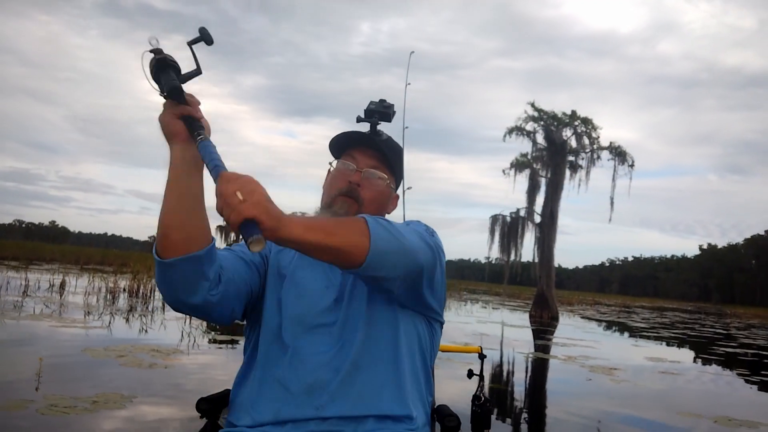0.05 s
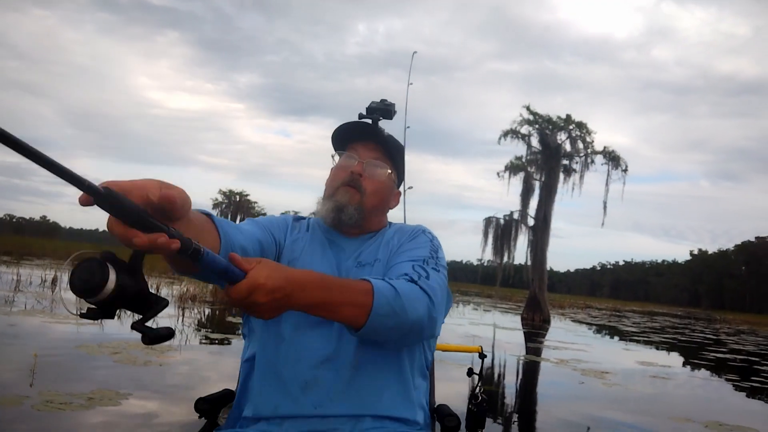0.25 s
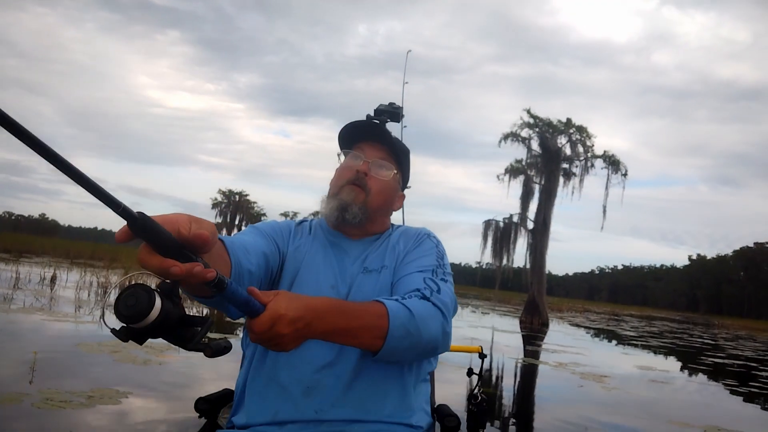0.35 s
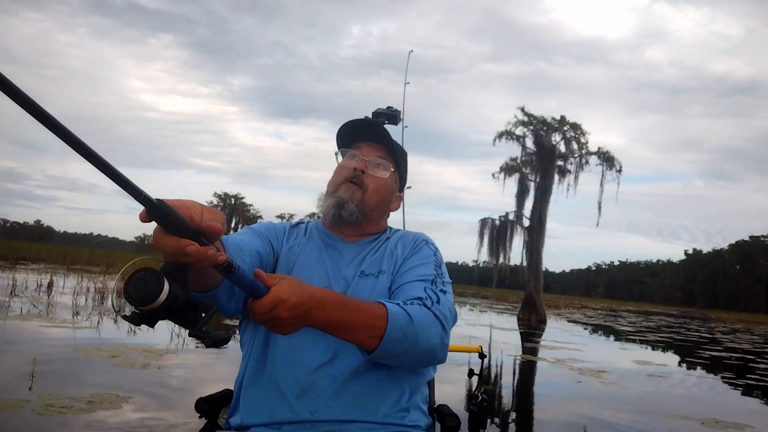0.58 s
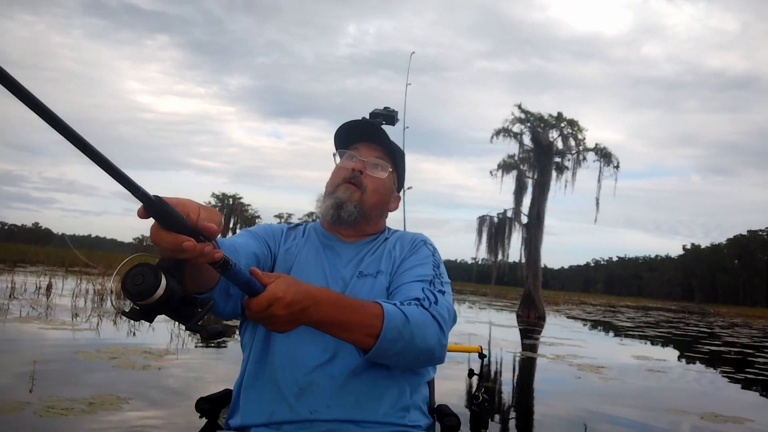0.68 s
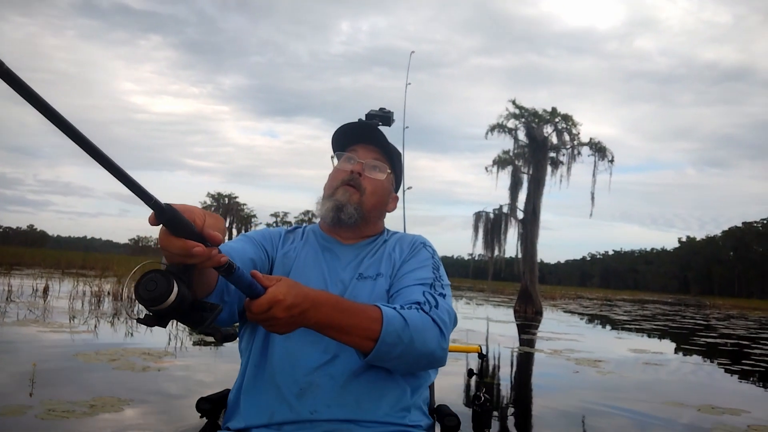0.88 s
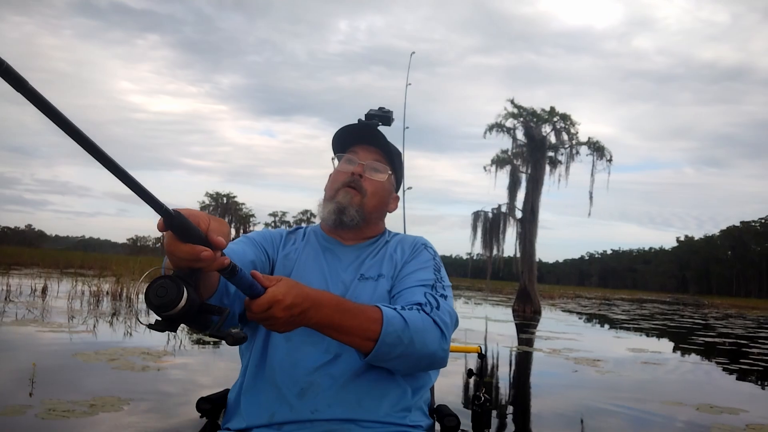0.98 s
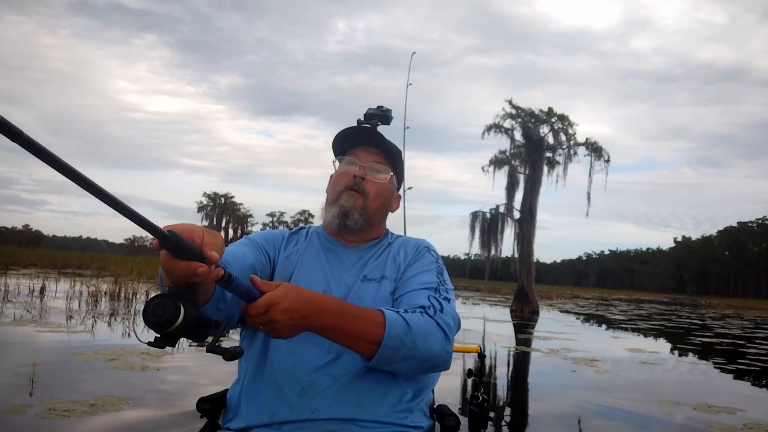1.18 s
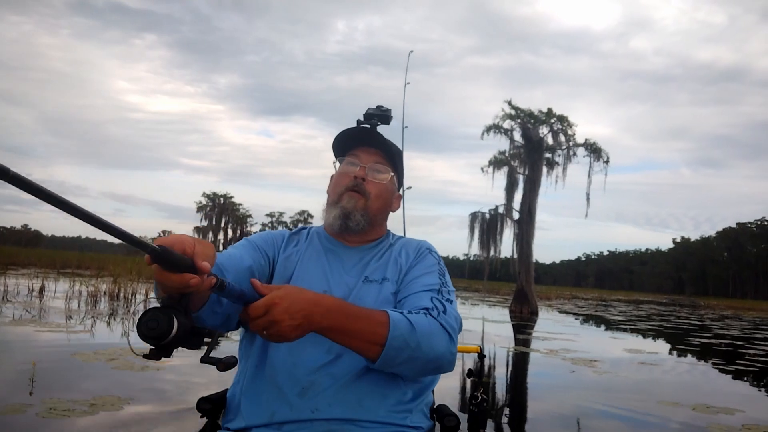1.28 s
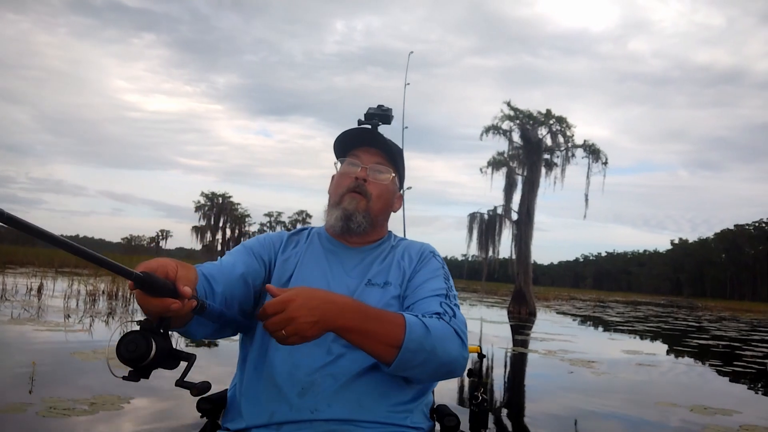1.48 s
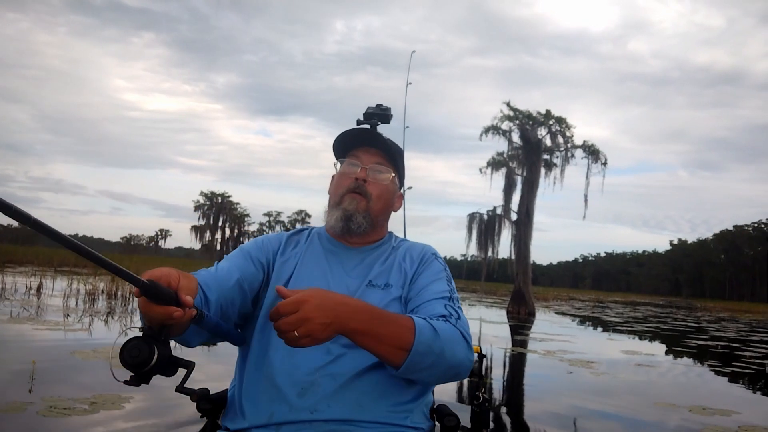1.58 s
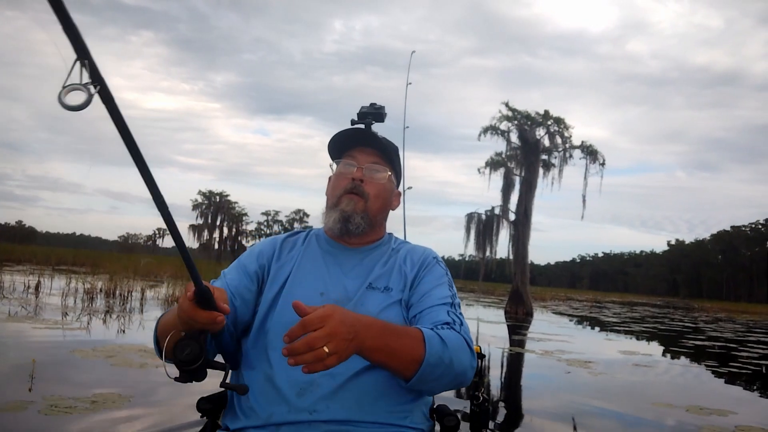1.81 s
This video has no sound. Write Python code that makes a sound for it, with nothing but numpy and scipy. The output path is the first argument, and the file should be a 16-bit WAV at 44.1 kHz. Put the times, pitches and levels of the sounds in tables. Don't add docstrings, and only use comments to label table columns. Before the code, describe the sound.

A fishing cast, heard close on a stereo camera microphone. Small rod and reel knocks at 0.02 s, then a brief loud swish with snap and clack around 0.2-0.25 s. Line rushes off the spool in a bright, gritty hiss with rattle and faint hum, strong until 0.7 s, thinning to scattered ticks, one sharper at 0.98 s. Quiet marsh air and far insects remain; a faint falling chirp at 1.72 s.

```python
import sys
import numpy as np
from scipy import signal
from scipy.fft import rfft, irfft
from scipy.io import wavfile
from scipy.ndimage import uniform_filter1d

SR = 44100
rng = np.random.default_rng(int(sys.argv[2]) if len(sys.argv) > 2 else 0)


def wav_out(sig):
    wavfile.write(sys.argv[1], SR, np.round(np.clip(np.atleast_2d(sig).T, -1, 1) * 32767).astype(np.int16))


def voltage_ratio(level):
    return 10 ** (np.asarray(level, float) / 20)


N = 81585
ROD_LAG_S = .00032
LINE_FREE_S = .2


def evened(x):
    return x / np.sqrt(np.mean(x ** 2) + 1e-20)


def read(points, hz):
    f, value = np.transpose(points)
    return np.interp(np.log(hz + 1), np.log(f + 1), value)


def along(table, column):
    rows = np.array(table)
    return np.interp(np.arange(N) / SR, rows[:, 0], rows[:, column])


def add(mix, s, sound):
    part = mix[:, round(s * SR):][:, :sound.shape[1]]
    part += sound[:, :part.shape[1]]


def ring(x, hz, width):
    r = np.exp(-np.pi * width / SR)
    poles = [1, -2 * r * np.cos(2 * np.pi * min(hz, SR / 2.2) / SR), r * r]
    once = signal.lfilter([1, 0, -1], poles, x)
    return signal.lfilter([1], poles, once)


def pair(x, lag_s, pan_db):
    late = np.roll(x, round(lag_s * SR), -1)
    return np.array([voltage_ratio(pan_db / 2) * late, voltage_ratio(-pan_db / 2) * x])


def hiss(spectrum, same, lag_s, pan_db, patchy_db, flicker_db, size, pitch=0.97, sag=0.):
    frames, hz = 4 * N // size + 5, np.fft.rfftfreq(size, 1 / SR)
    a, b, c, d, patches = rng.standard_normal((frames, len(hz), 5)).T
    patches = uniform_filter1d(patches, size=9, axis=0)
    patches = evened(uniform_filter1d(patches, size=9, axis=1))
    flicker = evened(uniform_filter1d(rng.standard_normal(frames), size=4))
    same = np.clip(same(hz), -1, 1)[:, None]
    right = a + 1j * b
    lag = np.exp(-2j * np.pi * hz * lag_s)[:, None]
    left = same * right * lag + np.sqrt(1 - same ** 2) * (c + 1j * d)
    slide = np.maximum(pitch - sag * np.arange(frames) * size / (4 * SR), .3)
    level_db = read(spectrum, hz[:, None] / slide) + patchy_db * patches + flicker_db * flicker
    z = np.array([left * voltage_ratio(pan_db), right]) * voltage_ratio(level_db)
    return evened(signal.istft(z, nperseg=size, noverlap=3 * size // 4)[1][:, :N])


def chirp():
    length_s, start_hz, end_hz = .07, 5400, 4550
    t = np.arange(0, length_s, 1 / SR)
    hz = start_hz + (end_hz - start_hz) * (t / length_s) ** 4
    rasp = evened(ring(rng.standard_normal(len(t)), 200, 350))
    swell = np.sqrt(np.hanning(len(t)))
    note = voltage_ratio(-64.5) * swell * rasp * np.sin(2 * np.pi * np.cumsum(hz) / SR)
    return pair(note, -.00039, 1.5)


# frequency in Hz, level in dB per Hz.
MARSH_COLOUR = [(26, -66), (60, -4.5), (125, -3.5), (200, -13.5), (1400, -25.5), (2300, -25.5), (5000, -14),
                (6800, -18), (8500, -28), (16500, -43)]
# frequency in Hz, left-right likeness from 0 to 1.
MARSH_LIKENESS = [(60, 0.52), (240, 1), (950, 0.35), (3770, 0.084), (15000, 0.57)]


def marsh():
    bed = hiss(MARSH_COLOUR, lambda hz: read(MARSH_LIKENESS, hz), -.0005, 1.5, 1.15, 1.0, size=1024)
    level_db, lull_db, return_s = -64.5, -7, 0.18
    out = voltage_ratio(level_db + lull_db * np.exp(-np.arange(N) / SR / return_s)) * bed
    add(out, 1.722, chirp())
    return out


# start in seconds, peak in dB, pitch in Hz, 60 dB decay in seconds.
KNOCK_HITS = [(0.0202, -47.5, 700, 0.027), (0.021, -45.5, 1270, 0.027), (0.0216, -50.5, 2255, 0.016),
              (.022, -51.5, 2900, 0.018), (.021, -50, 1700, 0.029), (0.023, -57, 214, 0.044),
              (0.043, -58.5, 460, 0.015), (0.14, -53.5, 2400, 0.012), (.168, -47.5, 731, 0.13),
              (.182, -39, 890, 0.026), (0.2, -26.5, 567, 0.023), (.203, -45, 1200, 0.018),
              (0.24, -24, 2150, 0.022), (0.24, -36.5, 370, 0.026), (.256, -38.5, 2310, 0.045),
              (.372, -44, 640, 0.033), (0.38, -32, 1330, 0.014), (0.42, -51, 134, 0.11),
              (.422, -40, 580, 0.022), (0.43, -30.5, 1300, 0.013), (0.427, -50.5, 100, 0.052),
              (0.38, -51, 290, 0.013), (.63, -49.5, 343, .025), (0.713, -54.5, 96, .12),
              (0.58, -53.5, 136, 0.12)]
# multiple of its pitch, level in dB.
KNOCK_MODES = [(.42, -9.5), (1., 6.5), (1.63, 1), (2.9, -32), (5.3, -6)]


def knocks():
    out, t = np.zeros((2, N)), np.arange(3000) / SR
    for (s, peak_db, hz, t60), grit in zip(KNOCK_HITS, rng.standard_normal((len(KNOCK_HITS), 3000))):
        body = 0
        for k, db in KNOCK_MODES:
            body = body + voltage_ratio(db - 60 * t * np.sqrt(k) / t60) * np.sin(2 * np.pi * k * hz * t)
        scrape = voltage_ratio(-6.5 - 60 * t / 0.02) * signal.lfilter([.4], [1, -.6], grit)
        sound = np.minimum(t / 0.00061, 1) * (0.56 * body + scrape)
        add(out, s, pair(np.append(voltage_ratio(peak_db) * sound, np.zeros(40)), ROD_LAG_S, -2.3))
    return out


# time in seconds, level in dB.
TIP_STROKE = [
    (0.13, -78),
    (0.194, -51),
    (0.202, -41.5),
    (0.226, -38.5),
    (0.244, -31.5),
    (0.284, -51),
    (0.3, -50),
]
# frequency in Hz, level in dB per Hz.
SWISH_COLOUR = [(88, -49), (150, -23), (500, -5), (1100, -4), (2200, -1.5), (4070, -8.5), (4540, -1),
                (6000, -8.5), (12000, -20.5), (15600, -9), (22000, -120)]


def swish():
    t = np.arange(N) / SR
    early, late = np.maximum(TIP_STROKE[0][0] - t, 0), np.maximum(t - TIP_STROKE[-1][0], 0)
    over_db = -300 * late - 300 * early
    air = hiss(SWISH_COLOUR, lambda hz: .75 - .00003 * hz, ROD_LAG_S, 0.22, 2.7, 1.9, size=256)
    return voltage_ratio(along(TIP_STROKE, column=1) + over_db + 4.5) * air


# frequency in Hz, level in dB.
TICK_COLOUR = [(3000, -42), (6000, -24), (9000, -14), (12500, -11), (14300, -6), (15300, 0), (16000, -2),
               (16600, -40)]


def tick(bright, grit, rise_s, fall_s):
    t = np.maximum(np.arange(len(grit)) - 20, 0) / SR
    burst = grit * np.minimum(t / rise_s, 1) * np.exp(-t / fall_s)
    colour = voltage_ratio(bright * read(TICK_COLOUR, np.fft.rfftfreq(len(grit), 1 / SR)))
    sound = irfft(rfft(burst) * colour, len(grit))
    return sound / abs(sound).max()


def coils():
    since = np.maximum(np.arange(N) / SR - LINE_FREE_S, 0)
    slow, fast, half_s = 900, 5000, .2
    rate = slow + fast * .5 ** (since / half_s)
    spread_db = 3. * np.minimum(rng.exponential(1, N), 4)
    size = voltage_ratio(spread_db) * (rng.random(N) < rate / SR)
    kind, grits = rng.integers(0, 16, N), rng.standard_normal((16, 300))
    ticks = np.zeros((2, N))
    for k, grit in enumerate(grits):
        train = signal.oaconvolve(size * (kind == k), tick(.65 + .035 * k, grit, .0003, .0007))[:N]
        ticks += pair(train, ROD_LAG_S + .00003 * (k % 5 - 2), 1.6 * (k % 4 - 1.5))
    start_db, end_db, swing_s = -8, -2.5, .3
    pan_db = end_db + (start_db - end_db) * np.exp(-since / swing_s)
    return evened(ticks / np.sqrt(rate)) * voltage_ratio(np.array([pan_db / 2, -pan_db / 2]))


# frequency in Hz, level in dB per Hz.
SPRAY_COLOUR = [(1500, -24.5), (4000, -14.5), (6500, -18.5), (8500, -7.5), (10000, -2), (12000, -2.5),
                (16000, -17.5), (30000, -43)]


def spray():
    return hiss(SPRAY_COLOUR, lambda hz: .55 - .00003 * hz, ROD_LAG_S, -1.5, 1.86, 1.8, size=256,
                pitch=1.224, sag=0.48)


# frequency in Hz, level in dB per Hz.
RATTLE_COLOUR = [(50, -60), (110, -15.5), (250, -7), (450, -4.5), (900, -9.5), (2900, -14.5), (4050, -21.5),
                 (4900, -7.5), (7000, -18.5), (12000, -46.5)]


def rattle():
    return hiss(RATTLE_COLOUR, lambda hz: .88 - .00005 * hz, ROD_LAG_S, -2.3, 1.47, 1.0, size=512)


# time in seconds, level in dB,
# spray in dB over that level, rattle in dB over that level.
LINE_RUN = [(.175, -87.5, -32, 20), (.2, -45, -20, 0.5), (.3, -45, -8, -4), (.4, -40.5, -14, -3.5),
            (.46, -42.5, -6, -6), (.52, -40.5, -14.5, -9.5), (.6, -44, -5, -15.5), (.67, -44, -7, -16.5),
            (.76, -51, -2.5, -12.5), (.93, -58.5, 4, -8), (1.07, -63.5, -0.5, -6), (1.25, -70, 5.5, -4.5),
            (1.45, -74.5, -1, -6), (1.85, -79, -12, -27)]


def line():
    ticks = coils()
    fizz = voltage_ratio(along(LINE_RUN, column=2)) * spray()
    shake = voltage_ratio(along(LINE_RUN, column=3)) * rattle()
    return voltage_ratio(along(LINE_RUN, column=1)) * (ticks + fizz + shake)


# start in seconds, peak in dB, left over right in dB, brightness as a factor.
CAUGHT_COILS = [(.1974, -33, -6, .5), (.2174, -31, -9, 1.5), (.2263, -31, -9, 1.6),
                (.2308, -15.5, -11, 2.1), (.2336, -18, -7, 2.1), (.2364, -26, -8, 1.8),
                (.2416, -22, -12, 1.3), (.3714, -34, -5, .8), (.4114, -32, -5, 1.1), (.4876, -30, -4, .9),
                (.4936, -33, -4, .8), (.4991, -30, -5, 1.2), (.5056, -35, -4, 1.), (.5194, -35, -4, 1.2),
                (.5464, -35, -5, 1.1), (.5594, -35, -3, 1.1), (.5874, -36, -3, 1.1), (.66, -39, -3, 1.),
                (.685, -36, -3.5, .9), (.7274, -39, -3, 1.1), (.8655, -46, -2, 1.), (.8999, -44, -3, .9),
                (.9592, -47, -3, 1.3), (.9834, -30.5, -8.5, .8), (1.0091, -54, -3, .4),
                (1.0445, -48, -4.5, 1.1), (1.061, -52, -3, .9), (1.1009, -52, -4, .6),
                (1.1124, -50, -3, .7), (1.1303, -48, -6.5, 1.), (1.1474, -50, -3, 1.5),
                (1.1663, -53, -3, 1.4), (1.1794, -54, -3, .2), (1.1922, -53, -5.5, .8),
                (1.2438, -41.5, -7, .7), (1.29, -52, -5, .8), (1.3174, -58, -6, .8), (1.3289, -47, -6, .3),
                (1.3613, -46, -9.5, .8), (1.4002, -60, -2, .8), (1.4463, -46, -5, .5),
                (1.5085, -62, -2, .7), (1.5319, -63, -1.5, .8), (1.5778, -64, -1, .8),
                (1.6197, -61, -2, 1.), (1.6437, -61, -1.5, .9), (1.6661, -61, -2, 1.),
                (1.6891, -61, -3, .9), (1.713, -61, -2.5, .9), (1.737, -60, -2.5, 1.)]


def snaps():
    out = np.zeros((2, N))
    for (s, peak_db, pan_db, bright), grit in zip(CAUGHT_COILS, rng.standard_normal((len(CAUGHT_COILS), 300))):
        snap = voltage_ratio(peak_db + .5) * tick(bright, grit, rise_s=.0005, fall_s=.001)
        add(out, s, pair(snap, ROD_LAG_S, pan_db))
    return out


def reel():
    t = np.arange(N) / SR - LINE_FREE_S
    drift = uniform_filter1d(uniform_filter1d(rng.standard_normal((2, N)), size=700), size=500)
    throb = voltage_ratio(3.5 * evened(drift))
    a, b = rng.standard_normal((2, N)) * throb
    spool = voltage_ratio(-60.5 - 20.5 * t) * evened(ring(a, hz=1413, width=280))
    hum = voltage_ratio(-59.5 - 13 * t) * evened(ring(b, hz=131.6, width=182))
    return (pair(spool, 0.000067, -0.052) + pair(hum, ROD_LAG_S, -2.5)) * np.clip(t / 0.1, 0, 1)


def scene():
    return marsh() + swish() + line() + snaps() + reel() + knocks()


# start in seconds, end in seconds, low edge in Hz, high edge in Hz.
MIDDLE_GAPS = [(.288, .4, 3130, 3440), (.288, .375, 3640, 3860), (.305, .33, 3640, 4330),
               (.31, .375, 4040, 4330), (.372, .482, 3780, 4200), (.305, .35, 6100, 6350),
               (.4, .478, 6250, 6550), (.46, .482, 3200, 3600), (.528, .55, 3400, 4000),
               (.505, .545, 4250, 4480), (.555, .615, 4050, 4300), (.96, .982, 3700, 4600)]


def thinned(x):
    mid_side = np.array([x[0] + x[1], x[0] - x[1]]) / 2
    hz, t, z = signal.stft(mid_side, SR, nperseg=1024, noverlap=896)
    gap = np.zeros(z.shape[1:], bool)
    for start, end, low, high in MIDDLE_GAPS:
        gap |= np.outer((hz > low) & (hz < high), (t > start) & (t < end))
    z[0] *= np.where(gap, voltage_ratio(-60), 1)
    mid, side = signal.istft(z, SR, nperseg=1024, noverlap=896)[1][:, :N]
    return np.array([mid + side, mid - side])


def roll_off(x):
    return signal.sosfilt(signal.butter(12, 16960, fs=SR, output="sos"), x)


def record(dry):
    bass_cut = signal.butter(3, 60, "high", fs=SR, output="sos")
    treble_cut = signal.firwin(301, 15950, window=("kaiser", 7), fs=SR)
    cut = signal.sosfilt(bass_cut, dry)
    cut = signal.oaconvolve(cut, treble_cut[None], "same")
    return roll_off(thinned(cut))


dry = scene()
out = record(dry)
wav_out(out)
```